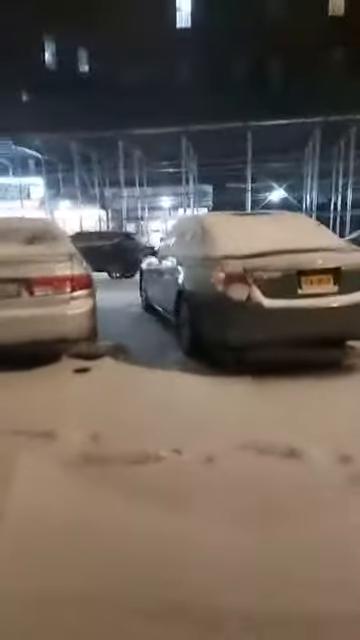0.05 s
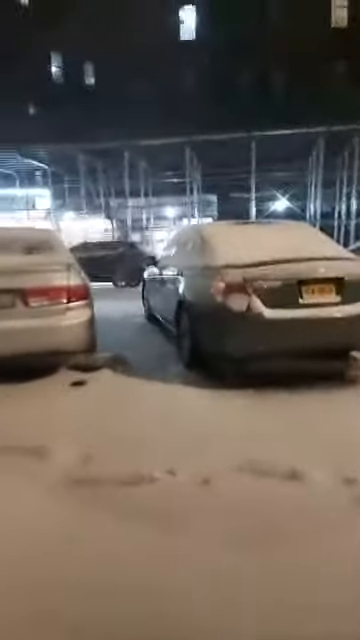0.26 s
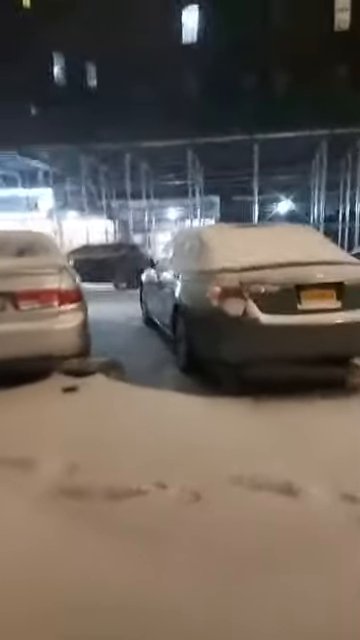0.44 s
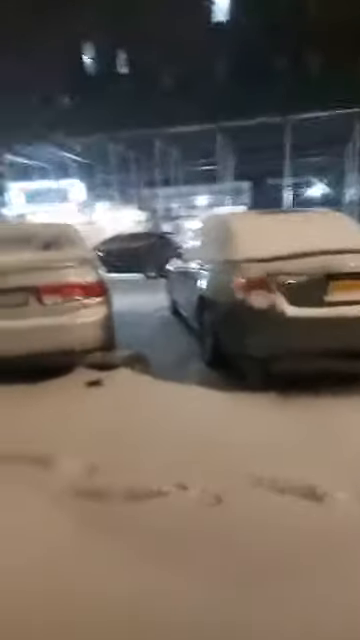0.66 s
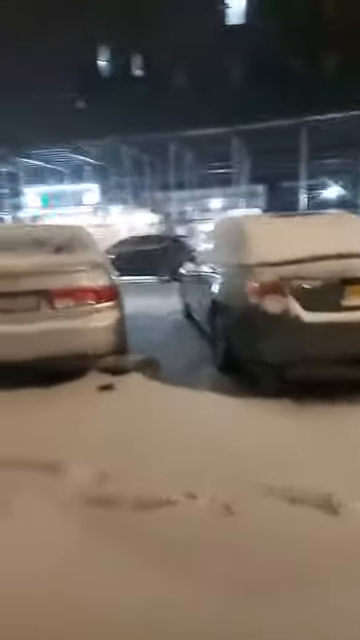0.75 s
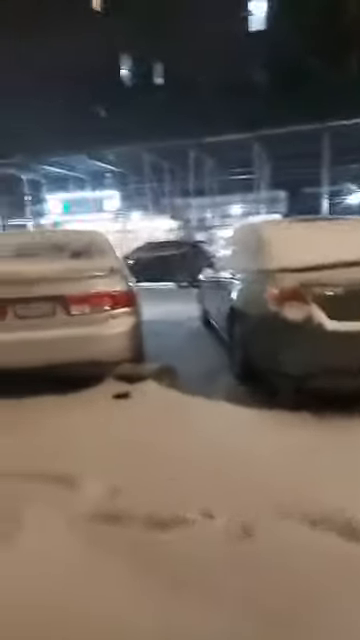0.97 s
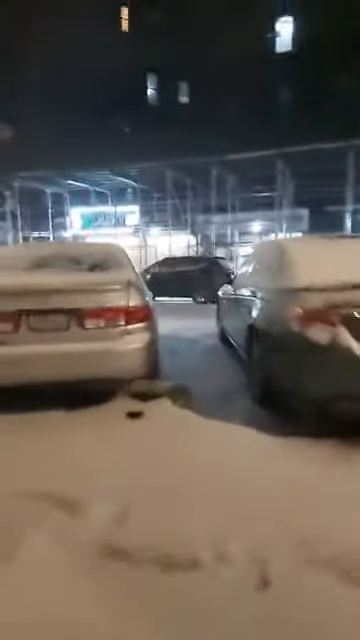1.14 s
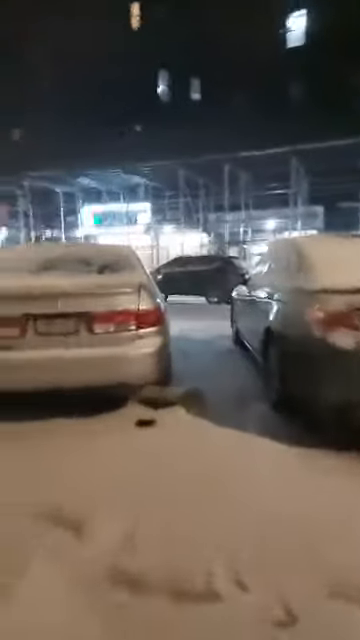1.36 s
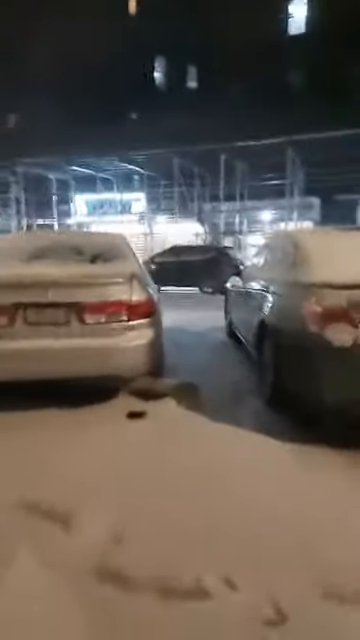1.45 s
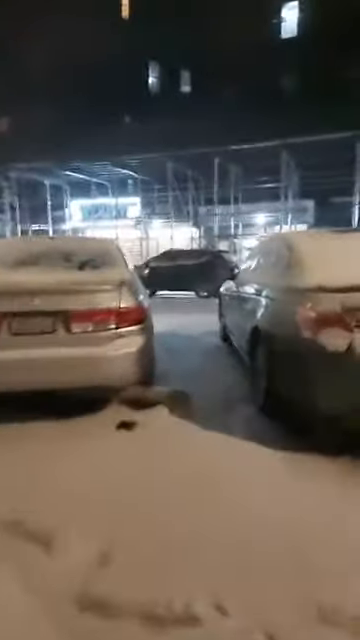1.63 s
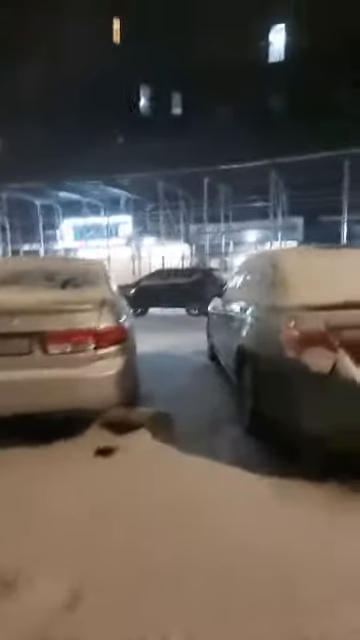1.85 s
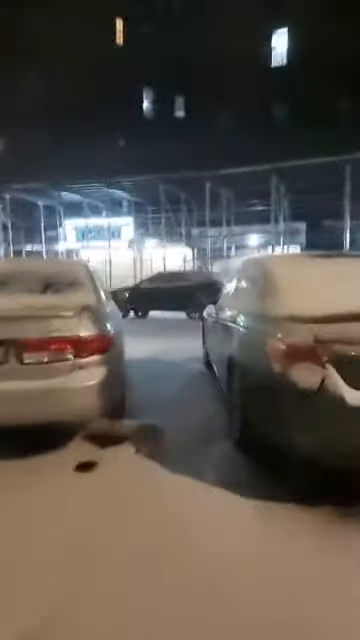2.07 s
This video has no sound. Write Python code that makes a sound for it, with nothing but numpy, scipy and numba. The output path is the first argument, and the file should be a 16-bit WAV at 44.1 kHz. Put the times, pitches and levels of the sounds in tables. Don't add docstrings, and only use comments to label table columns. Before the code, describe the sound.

Wind buffets a phone microphone in an open snowy car park, with low rumble, thumps and rough flutter from the start, strongest around 0.3-0.45 s. It falls to a lull at 0.55-0.8 s, exposing soft traffic, rustle and two faint squeaks. Gusts surge from 0.85 s, hitting hard near 1.1, 1.25, 1.55 and 1.8 s, then weaken after 1.9 s. Tiny ice ticks scatter throughout; a dull knock lands near 1.74 s.

```python
import sys
import numpy as np
from scipy import signal
from scipy.fft import rfft, irfft
from scipy.io import wavfile
from scipy.ndimage import uniform_filter1d
from numba import njit

SR = 44100
rng = np.random.default_rng(int(sys.argv[2]) if len(sys.argv) > 2 else 0)


def dump_mix(stems):
    frames = np.atleast_2d(stems).T
    limited = np.clip(frames, -1, 1)
    pcm = np.round(limited * 32767).astype(np.int16)
    wavfile.write(sys.argv[1], SR, pcm)


def voltage_ratio(decibels):
    exponent = np.asarray(decibels, float) / 20
    return 10 ** exponent


N = 92565

# freq_hz, level_db (per Hz)
TRAFFIC_COLOUR = [(120, -25.5), (300, 6), (600, -0.5), (850, 3), (1400, -2), (2300, -12), (3200, -23.5),
                  (6000, -35)]
# time_s, level_db, air_db (airy top relative to the body)
RUSTLE_SWELLS = [(0, -69, -3.5), (0.129, -72.5, -15), (.2, -65.5, -4), (0.351, -63.5, -4.5),
                 (0.411, -60, 0), (0.501, -65, -3.5), (0.63, -63, -9), (0.68, -70.5, -3),
                 (0.898, -71.5, -7.5), (0.999, -65.5, -6), (1.119, -65.5, -7), (1.2, -62.5, -4.5),
                 (1.3, -67.5, -7.5), (1.5, -69.5, -6.5), (1.72, -67.5, -3), (1.76, -62.5, 0.5),
                 (1.93, -59, -3), (2.09, -64.5, -2)]
# freq_hz, level_db
RUSTLE_BODY_COLOUR = [(1200, -5), (2400, 0), (4500, -1.5), (7500, -5.5), (9200, -12), (9500, -18.5),
                      (11000, -12), (11500, -25.5)]
# freq_hz, level_db
RUSTLE_AIR_COLOUR = [(11000, -25), (11400, -4), (13500, -5.5), (15600, -3), (16500, -4)]
# start_s, length_s, pitch_hz, level_db
SQUEAKS = [
    (.575, .115, 4090, -65),
    (.755, .08, 4120, -70),
]
# start_s, peak_db,
# ring_hz, width_hz, crack_db (relative to the ring)
ICE_TICKS = [(0.099, -45.5, 3800, 5000, -21), (0.1503, -50, 6000, 5000, -15),
             (.1645, -52.5, 5000, 6000, -13.5), (0.2318, -46, 3900, 3500, -15),
             (0.2876, -49.5, 3640, 7000, -9), (.399, -52, 3500, 6000, -14), (.4075, -49, 7500, 5000, -16),
             (.441, -49.5, 6000, 8000, -7), (0.5716, -40.5, 4380, 8000, -8.5),
             (.575, -51.5, 8200, 2500, -14), (.655, -63.5, 5700, 1500, -19),
             (0.846, -58, 3610, 4000, -13.5), (0.9887, -44.5, 4600, 8000, -17.5),
             (1.0885, -51, 6500, 3500, -10), (1.153, -52.5, 5500, 8000, -12.5),
             (1.1635, -50.5, 3800, 2500, -14.5), (1.1662, -44, 5200, 4000, -6),
             (1.4197, -58, 3740, 5000, -7), (1.4358, -45.5, 5000, 6000, -7.5),
             (1.5071, -41, 4000, 8000, -12), (1.5135, -58, 4000, 4000, -25), (1.5578, -38, 4100, 2500, -7),
             (1.5605, -49.5, 6500, 6000, -4), (1.715, -46, 4500, 8000, -11.5),
             (1.7558, -52.5, 5400, 3000, -3), (1.768, -60, 4300, 2500, -12),
             (1.818, -55.5, 5000, 2000, -11.5), (1.857, -54, 5000, 3000, -7),
             (1.912, -50.5, 6500, 3000, -3.5), (1.942, -52, 6000, 3000, -7.5),
             (2.0934, -55.5, 3930, 3500, -7)]
# start_s, peak_db, ring_hz
CASE_KNOCKS = [
    (.940, -54, 1900),
    (1.7385, -33, 1150),
    (1.783, -48, 2700),
    (1.911, -43, 1500),
]
# centre_s, peak_db, pitch_hz
THUMPS = [(.008, -12.5, 197), (.06, -16, 187), (.135, -12.5, 101.3), (0.171, -12, 110), (0.274, -7, 126),
          (.38, -6, 167), (.414, -11, 148), (.518, -16, 143), (0.599, -24.5, 108.5), (.81, -16, 102),
          (0.884, -12.5, 102.7), (0.964, -14.5, 129), (1.006, -11.5, 119.5), (1.101, -4.5, 168),
          (1.132, -8, 129.5), (1.212, -11.5, 99.5), (1.261, -7, 79.6), (1.299, -9.5, 130),
          (1.364, -13, 100), (1.424, -13, 93), (1.469, -13.5, 101), (1.512, -11.5, 98.5),
          (1.563, -6.5, 121), (1.662, -11, 97), (1.78, -8.5, 99), (1.814, -6.5, 149), (1.85, -20, 147),
          (1.897, -18, 106), (2.018, -23, 114), (2.051, -20.5, 128)]
# time_s (the kink's centre follows 2.8 ms later), peak_db, pitch_hz
EDGE_SNAPS = [(0.025, -25.5, 536), (0.063, -32, 536), (0.301, -24, 501), (0.378, -12.5, 563),
              (0.398, -20, 525), (0.445, -21.5, 501), (0.836, -34, 560), (0.86, -33.5, 501),
              (1.005, -23.5, 501), (1.037, -31.5, 501), (1.1, -12.5, 501), (1.122, -26.5, 528),
              (1.14, -14, 530), (1.256, -21, 762), (1.284, -18, 546), (1.344, -30, 501),
              (1.423, -23.5, 541), (1.474, -35, 536), (1.541, -21.5, 724), (1.564, -15, 554),
              (1.579, -38, 579), (1.657, -29.5, 622), (1.673, -23.5, 584), (1.808, -29.5, 501),
              (1.888, -32, 519)]
# time_s, rumble_db
GUST = [(0, -16), (.17, -23), (.215, -23.5), (.27, -20.5), (.41, -20), (.53, -22), (.56, -32.5),
        (.74, -39.5), (.82, -26), (1.09, -16.5), (1.28, -19), (1.57, -17), (1.62, -26), (1.665, -18),
        (1.735, -25), (1.79, -16), (1.96, -36), (2.06, -26.5)]
# start_s, peak_db, length_s, brightness_db
PUFFS = [(0.004, -13.5, 0.063, -27), (0.042, -13.5, 0.042, -16), (0.148, -12.5, 0.03, -23),
         (0.168, -15.5, 0.058, -38.5), (0.301, -12, 0.073, -28), (0.349, -15.5, 0.045, -11),
         (0.368, -14.5, 0.072, -15), (0.413, -19, 0.014, -15.5), (0.446, -19.5, 0.04, -20),
         (0.458, -25.5, 0.035, -28), (0.783, -22, 0.078, -17.5), (0.83, -13, 0.038, -24),
         (0.851, -15, 0.072, -20), (0.957, -19, 0.065, -17), (0.984, -18.5, 0.035, -21),
         (1.088, -11.5, 0.056, -16), (1.115, -17, 0.034, -17), (1.133, -16.5, 0.045, -9),
         (1.176, -13.5, 0.074, -20), (1.229, -12, 0.022, -30), (1.269, -15, 0.035, -12),
         (1.341, -13, 0.02, -18), (1.421, -27, 0.11, -20.5), (1.495, -22, 0.027, -28.5),
         (1.547, -14.5, 0.045, -25), (1.556, -10, 0.02, -18), (1.668, -16, 0.017, -14.5),
         (1.799, -10, 0.066, -27.5), (1.891, -25.5, 0.022, -21.5), (2.01, -23.5, 0.05, -9)]


def unit(x):
    return x / np.sqrt(np.mean(x ** 2))


def curve(table):
    return np.interp(np.arange(N) / SR, *np.array(table).T)


@njit
def svf(x, hz, damp):
    out, b, l = np.empty((3, len(x))), 0., 0.
    for i in range(len(x)):
        g = np.tan(np.pi * hz[i] / SR)
        v = (b + g * (x[i] - l)) / (1 + g * (g + damp))
        low = l + g * v
        b, l = 2 * v - b, 2 * low - l
        out[0, i], out[1, i], out[2, i] = low, damp * v, x[i] - damp * v - low
    return out


def band(x, hz, width_hz):
    return svf(x, np.full(len(x), 1. * hz), width_hz / hz)[1]


def steep_band(x, hz, width_hz):
    return band(band(x, hz, width_hz), hz, width_hz)


def walk(rate):
    draws = rng.standard_normal(2000)
    k = max(int(SR / rate), 2)
    held = draws[np.minimum(np.arange(N) // k, len(draws) - 1)]
    return unit(uniform_filter1d(uniform_filter1d(held, k), k))


def coloured(table, flicker_db, rate):
    f = np.fft.rfftfreq(N, 1 / SR) + 1
    hz, db = np.array(table).T
    colour_db = np.interp(np.log(f), np.log(hz), db, left=-60)
    spec = rfft(rng.standard_normal(N)) * voltage_ratio(colour_db)
    half_octave = np.floor(2 * np.log2(f / 40)).clip(0, 17)
    out = np.zeros(N)
    for k in range(18):
        out += irfft(spec * (half_octave == k), N) * voltage_ratio(flicker_db * walk(rate))
    return unit(out)


def add(out, start, sound):
    i = int(start * SR)
    out[i:i + len(sound)] += sound[:N - i]


def traffic():
    return voltage_ratio(-52) * coloured(TRAFFIC_COLOUR, 1.2, 15.7)


def rustle():
    time_s, level_db, air_db = np.array(RUSTLE_SWELLS).T
    grain = voltage_ratio(1.5 * walk(110) + .4 * walk(30))
    body = coloured(RUSTLE_BODY_COLOUR, 1., 23)
    air = voltage_ratio(curve(np.c_[time_s, air_db])) * coloured(RUSTLE_AIR_COLOUR, 1., 25)
    return (body + air) * unit(grain) * voltage_ratio(curve(np.c_[time_s, level_db]))


def squeaks():
    out = np.zeros(N)
    for start, length, hz, db in SQUEAKS:
        n = int(length * SR)
        air = unit(band(rng.standard_normal(SR // 4), hz, 150))[-n:]
        tone = voltage_ratio(-7) * np.sin(2 * np.pi * hz * np.arange(n) / SR)
        add(out, start, voltage_ratio(db) * np.hanning(n) ** .5 * (air + tone))
    return out


def strike(db, hz, width_hz, t60_s, crack_db):
    u = np.arange(2048) / SR
    burst = voltage_ratio(-13) * rng.standard_normal(len(u)) * np.exp(-np.log(1000) * u / t60_s)
    burst[0] = 1
    ring = steep_band(burst, hz, width_hz)
    crack = steep_band(burst, 13500, 4500)
    return voltage_ratio(db) * (ring / np.abs(ring).max() + voltage_ratio(crack_db) * crack / np.abs(crack).max())


def ticks():
    out = np.zeros(N)
    for start, db, hz, width_hz, crack_db in ICE_TICKS:
        add(out, start, strike(db, hz, width_hz, .011, crack_db))
    for start, db, hz in CASE_KNOCKS:
        add(out, start, strike(db, hz, 950, .02, -26))
    return out


def snaps():
    out, u = np.zeros(N), np.arange(-256, 256) / SR
    snap_db, cycles = 5, 0.42
    for start, db, hz in EDGE_SNAPS:
        kink = np.sin(2 * np.pi * hz * u) * np.exp(-(u * hz / cycles) ** 2)
        sign = np.sign(rng.standard_normal())
        add(out, start - .003, sign * voltage_ratio(db + snap_db) * kink / np.abs(kink).max())
    return out


def thumps():
    out, t = np.zeros(N), np.arange(N) / SR
    thump_db, cycles = -4.5, 1.16
    for centre, db, hz in THUMPS:
        u = t - centre
        out -= voltage_ratio(db + thump_db) * np.sin(2 * np.pi * hz * u) * np.exp(-(u * hz / cycles) ** 2)
    return out


def rumble(gust_db):
    return unit(steep_band(rng.standard_normal(N), 94.7, 115.7)) * voltage_ratio(gust_db - 4)


def puffs(gust_db):
    t, rise_s, edge = np.arange(N) / SR, .011, 3
    puff_db, between_db, usual_bright_db = -8, -5.5, -19
    power, bright = voltage_ratio(gust_db + between_db) ** 2, 0
    for start, db, length, bright_db in PUFFS:
        u = t - start - rise_s
        shape = np.exp(-np.abs(u / np.where(u < 0, rise_s, length)) ** edge)
        puff = (voltage_ratio(db + puff_db) * shape) ** 2
        power = power + puff
        bright = bright + puff * (bright_db - usual_bright_db)
    return power, bright / power


def soften(x, hz, damp):
    return svf(svf(x, hz, damp)[0], hz, damp)[0] / np.sqrt(hz)


def flutter(gust_db):
    power, bright_db = puffs(gust_db)
    force_db = 10 * np.log10(power) + 29.5
    eddies_db = 2.5 * walk(130)
    octaves = 0.508 * (force_db + eddies_db) / 10 + 0.0949 * bright_db
    corner_hz = np.clip(299 * 2 ** octaves, 60, 3000)
    body = soften(rng.standard_normal(N), corner_hz, 1.32)
    body = svf(body, np.full(N, 114.), 2.14)[2]
    spray_hz = 2.53 * corner_hz
    spray = svf(soften(rng.standard_normal(N), spray_hz, 0.72), 2 * spray_hz, 2.1)[0]
    spray_gain = voltage_ratio(-28 + force_db + .5 * bright_db)
    return unit(voltage_ratio(eddies_db)) * np.sqrt(power) * (unit(body) + spray_gain * unit(spray))


def wind():
    gust_db = curve(GUST)
    return rumble(gust_db) + flutter(gust_db)


def scene():
    limit = 0.67
    buffets = limit * np.tanh((wind() + snaps() + thumps()) / limit)
    buffets = svf(buffets, np.full(N, 2200.), 6.02)[0]
    return (buffets + traffic() + rustle() + ticks() + squeaks())[None]


def dropouts(x):
    spec, f = rfft(x), np.fft.rfftfreq(N, 1 / SR)
    hiss_db = curve(np.array(RUSTLE_SWELLS)[:, :2]) + 66
    edges_hz = np.linspace(9350, 11000, 6)
    for lo, hi in zip(edges_hz, edges_hz[1:]):
        shut = np.clip(-12 * (hiss_db + 2 + 3 * walk(12)) / 10, 0, .95)
        x = x - shut * irfft(spec * ((f >= lo) & (f < hi)), N)
    return x


def roll_off(x):
    return signal.sosfilt(signal.butter(12, 15700, fs=SR, output="sos"), x)


def record(dry):
    mix = svf(dropouts(dry[0]), np.full(N, 45.3), 0.61)[2][None]
    return roll_off(mix)


dry = scene()
out = record(dry)
dump_mix(out)
```